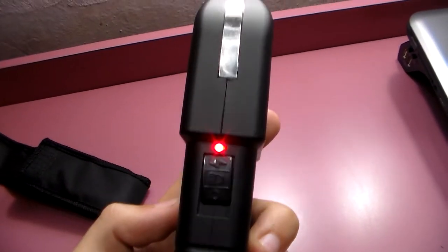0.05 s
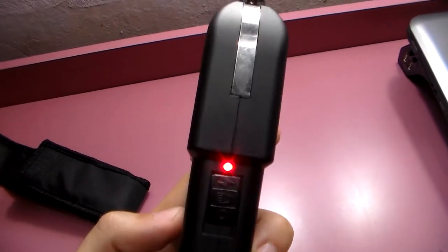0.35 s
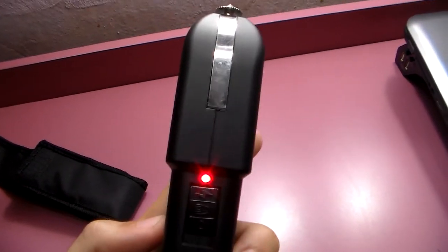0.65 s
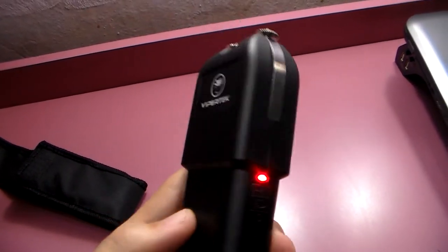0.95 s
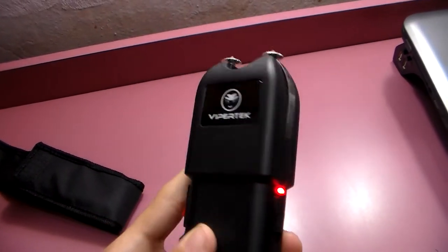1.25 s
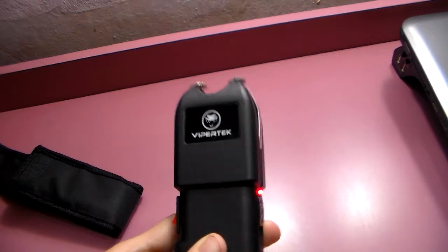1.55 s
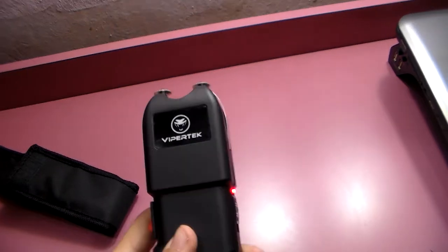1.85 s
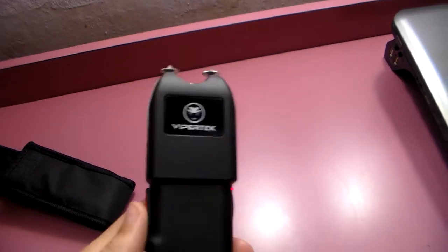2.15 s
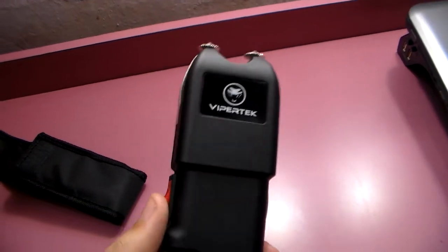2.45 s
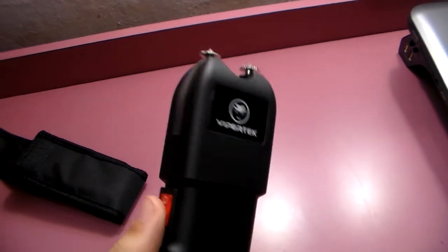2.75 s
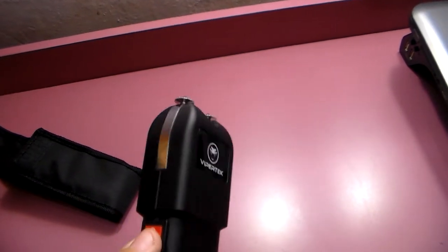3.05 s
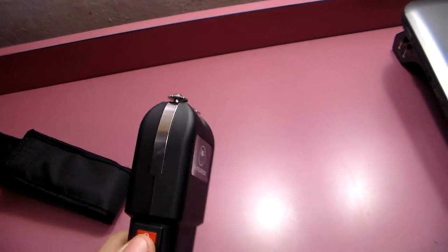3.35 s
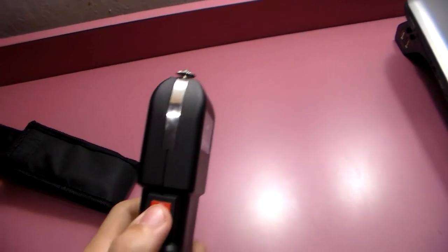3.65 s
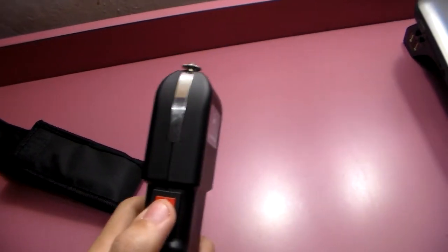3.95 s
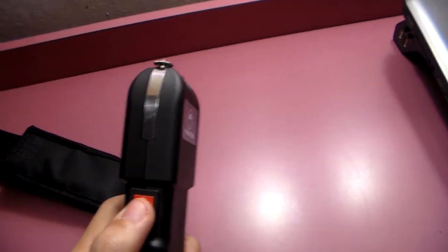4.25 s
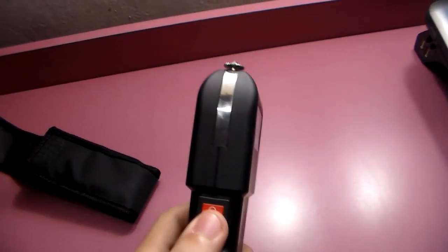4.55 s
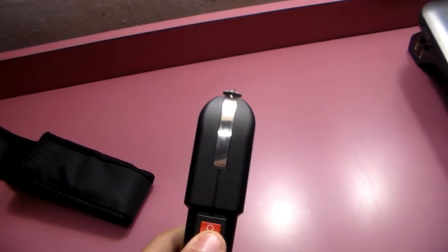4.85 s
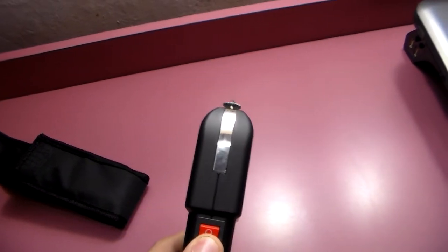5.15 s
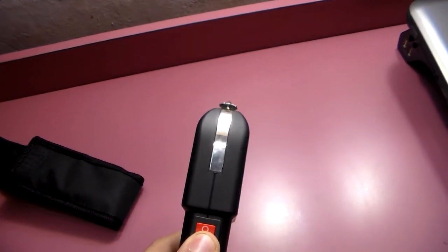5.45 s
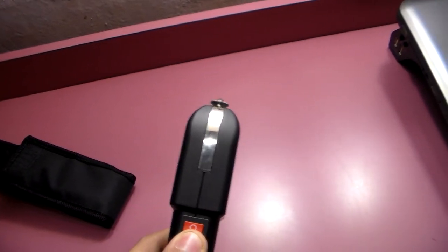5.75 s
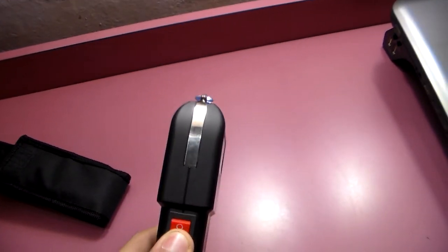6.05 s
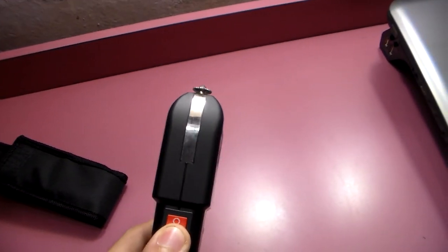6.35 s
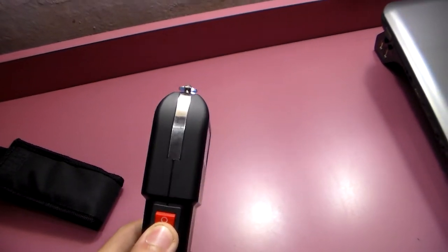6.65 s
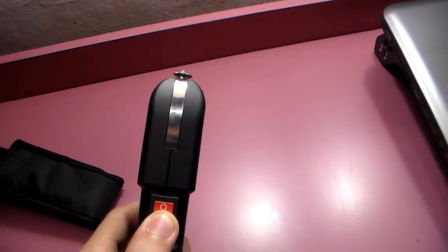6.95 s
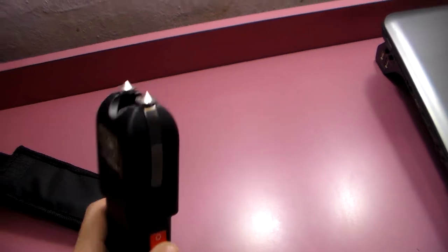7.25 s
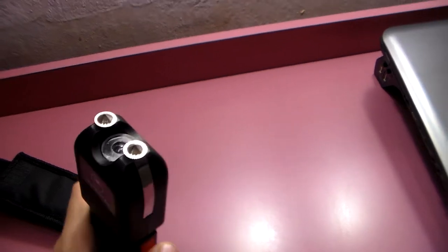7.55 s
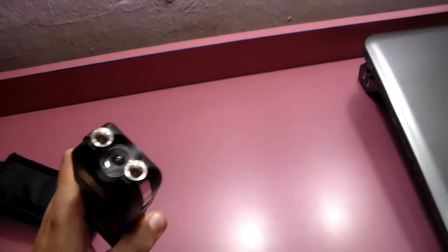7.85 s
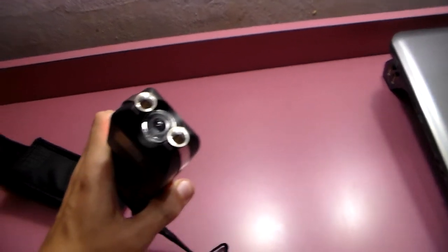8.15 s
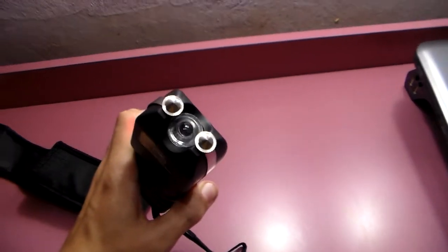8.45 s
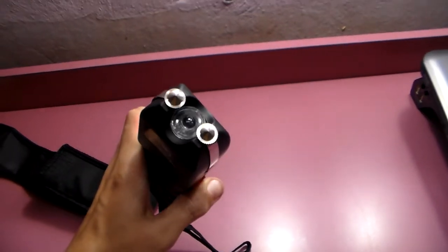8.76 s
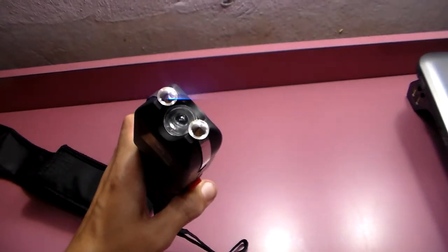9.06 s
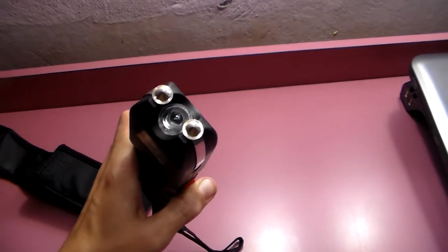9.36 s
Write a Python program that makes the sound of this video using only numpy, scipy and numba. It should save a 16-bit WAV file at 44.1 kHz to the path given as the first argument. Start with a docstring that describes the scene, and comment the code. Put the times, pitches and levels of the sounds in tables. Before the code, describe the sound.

A small room hums quietly with mains, fans and thin high tones. A handheld stun gun is turned over, its plastic case clicking faintly. About halfway through, it fires three short, very loud bursts of rapid cracking sparks that ring in the room and overload the close microphone. A few more clicks of the case and switch follow, then a fourth, slightly longer burst.

```python
"""A small room hums with mains and fans while two thin, high tones swell in the background.
A handheld stun gun is turned over above a desk: its plastic case clicks and skin squeaks faintly on it.
From about 5.5 s it fires three short bursts, 28 sparks a second, each a sharp crack that rings in the room.
The sparks overload the camera's input; its gain control ducks and swells back, twice with soft low ticks.
A few more clicks of case and switch follow, and a fourth, longer burst closes the scene."""
import sys
import numpy as np
from scipy import signal
from scipy.fft import rfft, irfft, next_fast_len
from scipy.io import wavfile
from scipy.ndimage import map_coordinates
from numba import njit

SR = 44100
rng = np.random.default_rng(int(sys.argv[2]) if len(sys.argv) > 2 else 0)


def store_wav(level_fs):
    """Save 16-bit WAV to argv[1]."""
    pcm = np.round(np.clip(np.atleast_2d(level_fs), -1, 1) * 32767)
    wavfile.write(sys.argv[1], SR, pcm.T.astype(np.int16))


N = 419391

# Stereo image of two microphone ports a finger's width apart.
# Each row: frequency in Hz, side minus mid in dB.
MIC_WIDTH = [(200, -11.5), (1000, -25.5), (2500, -18), (5000, -6.5), (8000, -1), (10500, 0), (14000, -3.5)]
# Trigger presses. Each row: first and last spark in seconds, crack trim in dB as the electrodes point at
# the camera, pop trim in dB, push on the input of the first spark and of later ones in full scales.
TRIGGER_BURSTS = [(5.462, 5.603, 0.5, 3, 2.74, 0.75), (6.1746, 6.3202, 2.4, 3, 2.0, 0.93),
                  (6.7677, 6.9137, 3.1, -1, 2.7, 0.45), (9.1596, 9.4160, 2.86, 4, 2.3, 0.81)]
SPARK_DB = 33  # the boost that drives the sparks into overload, and the range of the gain control


def amp(db):
    """Decibels to gain."""
    return 10 ** (np.asarray(db) / 20)


def unit(x):
    """Scale to rms 1."""
    return x / np.sqrt(np.mean(x ** 2) + 1e-20)


def along(points, hz):
    """Read (Hz, value) points on a log frequency axis."""
    f, v = np.transpose(points)
    return np.interp(np.log(hz + 1), np.log(f + 1), v)


def wobble(rate):
    """A smooth random curve, rate knots a second."""
    knots = rng.standard_normal(int(N * rate / SR) + 4)
    grid = np.arange(0, N, 64)
    return np.interp(np.arange(N), grid, map_coordinates(knots, [grid * rate / SR]))


def add(track, s, sound):
    """Mix a sound into a track at s seconds."""
    start = round(s * SR)
    track[..., start:start + sound.shape[-1]] += sound[..., :N - start]


def noise(spectrum, width, size):
    """Stereo noise of rms 1 with a given colour and width."""
    m = next_fast_len(size)
    hz = np.fft.rfftfreq(m, 1 / SR)
    spread = amp(along(width, hz))
    mid, side = rfft(rng.standard_normal((2, m))) * amp(along(spectrum, hz)) / np.hypot(1, spread)
    return unit(irfft([mid + spread * side, mid - spread * side], m)[:, :size])


def tone(hz, jitter_hz):
    """A sine of rms 1 whose pitch trembles."""
    return np.sqrt(2) * np.sin(2 * np.pi * np.cumsum(hz + jitter_hz * wobble(150)) / SR)


def room_tone(air_db=-51, whine_db=-73, whine_hz=10595, swing_hz=65, chirp_db=-82, chirp_hz=2870):
    """The bed: air noise, mains hum, fan tones and a thin electronic whine that warbles."""
    # Colour of the air. Each row: frequency in Hz, relative noise density in dB.
    air_colour = [(12, -29.5), (20, -3.5), (60, -0.5), (90, -14), (122, -15), (148, -12.5), (206, -18),
                  (242, -16), (319, -17), (356, -20), (386, -19), (787, -21), (1010, -23.5), (4550, -30.5),
                  (14000, -37)]
    # Width of the air. Each row: frequency in Hz, side minus mid in dB.
    air_width = [(60, -14.5), (180, -6.5), (550, -9.5), (1640, -6.5), (4950, -2), (14900, 3)]
    # Mains hum and fan tones. Each row: frequency in Hz, rms level in dB.
    hum_tones = [(119.8, -56), (239.7, -55.5), (355, -68), (526, -69.5), (538, -69.5), (600, -73),
                 (778, -68), (817, -74), (2040, -74), (2627, -76.5), (3090, -81.5), (3381, -76),
                 (3618, -75.5), (4608, -73), (5190, -80), (5539, -78), (5599, -76), (6530, -84),
                 (7757, -82)]
    air = amp(air_db + .5 * wobble(5)) * noise(air_colour, air_width, N)
    hum = 0
    for hz, db in hum_tones:
        depth_db = along([(240, .3), (800, 2.1), (4000, 3.1)], hz)  # higher tones flutter more
        flutter_db = depth_db * (.5 * wobble(1.505) + wobble(40))
        hum += amp(db + flutter_db) * tone(hz, jitter_hz=0.0021 * hz)
    warble_hz = 10.3 + 0.76 * wobble(3)
    warble = np.sin(2 * np.pi * np.cumsum(warble_hz) / SR)
    whine = amp(whine_db + 2.0 * wobble(60)) * tone(whine_hz + swing_hz * warble, jitter_hz=55.3)
    chirp = amp(chirp_db) * (1 + warble) * tone(chirp_hz, jitter_hz=20)  # pulses with the warble
    return air + hum + whine + chirp


def high_tones(low_hz=3731, high_hz=4257, low_db=-4):
    """Two thin tones that swell as the camera tips up."""
    # Fader ride. Each row: time in seconds, rms level of the upper tone in dB.
    swell = [(0, -91), (1.3, -72), (2.2, -77), (5, -80.5), (7.8, -73), (8.4, -68), (9.1, -67)]
    pair = amp(low_db) * tone(low_hz, jitter_hz=8) + tone(high_hz, jitter_hz=8)
    swell_db = np.interp(np.arange(N) / SR, *np.transpose(swell))
    return amp(swell_db + wobble(4.2)) * pair


def case_clicks(ring_t60=0.023, snap_t60=0.019, ring_q=7, room_db=-25, room_t60=0.43, attack_s=0.00084):
    """Plastic case and switch: each click is one damped resonance, a bright snap and a trace of room."""
    # Each row: start in seconds, relative level in dB, resonance in Hz, snap against the ring in dB.
    click_cues = [(1.3862, -43, 2340, -14), (1.5786, -41, 2340, -20), (1.7549, -43, 2430, -12),
                  (1.8448, -46, 4200, -18), (1.8947, -45, 2350, -17.5), (2.232, -50, 2600, -18),
                  (3.255, -43, 2450, -22), (3.266, -42, 2630, 5), (3.4665, -48, 2750, -20),
                  (5.1059, -30, 2180, -19), (5.813, -1.5, 600, -14), (6.528, -21, 600, -12),
                  (7.4001, -22.5, 2180, 3), (7.526, -22.5, 11700, -4), (7.949, -44, 2220, -15.5),
                  (9.1205, -37, 3975, 4)]
    contact_colour = [(500, -18), (2000, -6.5), (7000, -1.5), (14000, -13)]
    out, t = np.zeros((2, N)), np.arange(SR // 4) / SR
    attack = 1 - np.exp(-t / attack_s)
    for s, db, hz, snap_db in click_cues:
        contact = noise(contact_colour, MIC_WIDTH, len(t))
        ring = unit(signal.lfilter(*signal.iirpeak(hz, ring_q, fs=SR), contact))
        click = ring * amp(-60 * t / ring_t60) + contact * amp(snap_db - 60 * t / snap_t60)
        echo = (ring + amp(snap_db) * contact) * amp(room_db - 60 * t / room_t60)
        add(out, s, amp(db - 4.0) * (click + echo) * attack)
    return out


def grip_ticks(attack_s=.0007):
    """As the grip shifts, plastic snaps on plastic with a small, clean ring."""
    # Each row: start in seconds, level in dB.
    tick_cues = [(1.932, -39.5), (3.267, -46)]
    # The part's resonances. Each row: frequency in Hz, relative level in dB, seconds to fall 60 dB.
    plastic_modes = [(2700, 0.5, 0.021), (3250, -10, .015), (4657, -4, .012), (6778, -1, .014)]
    out, t = np.zeros(N), np.arange(SR // 10) / SR
    ring = sum(amp(db - 60 * t / t60) * np.sin(2 * np.pi * hz * t) for hz, db, t60 in plastic_modes)
    for s, db in tick_cues:
        add(out, s, amp(db) * ring * (1 - np.exp(-t / attack_s)))
    return out


def skin_squeak(db=-69, hz=4950, peak_s=4.26, fade_s=0.22):
    """One faint squeak of skin on plastic, fading in and out."""
    t = np.arange(N) / SR
    return amp(db) * np.exp(-((t - peak_s) / fade_s) ** 2) * tone(hz, jitter_hz=80.5)


def spark_times(start, stop, per_second=27.6):
    """While the trigger is held the gap charges and fires at a steady rate."""
    return np.linspace(start, stop, round((stop - start) * per_second) + 1)


def sparks(shock_db=4, crack_db=-4, crack_s=0.0093, pop_db=-15, pop_s=0.0054,
           first_pop_db=4.5, pop_scatter_db=3.5, echo_db=-13, build_s=0.0034, alike=0.59):
    """Each discharge: a shock front, a cluster of close reflections, a low pop and the room's tail."""
    # The crack with its reflections off the desk. Each row: frequency in Hz, relative density in dB.
    crack_colour = [(200, -38), (1000, -15.5), (2000, -10.5), (3200, -5.5), (4200, 2.5), (5600, 3.5),
                    (7500, 3.5), (10500, -4), (12500, 1.5), (14000, 0)]
    # The short, low pop of each spark overloading the input.
    # Each row: frequency in Hz, relative density in dB.
    pop_colour = [(60, -6.5), (250, -2.5), (450, 3.5), (750, -3), (1000, -5.5), (1500, -5), (3000, -13),
                  (8000, -30)]
    pop_width = [(150, 3.5), (600, -2.5), (2000, -3.5)]
    out, t = np.zeros((2, N)), np.arange(SR) / SR
    early = t[:SR // 25]
    shock_age = early / .00006
    shock = amp(shock_db) * (shock_age - 1) * np.exp(-shock_age)
    crack_fade, pop_fade = np.exp(-(early / crack_s) ** 2), np.exp(-early / pop_s)
    echo_build = amp(echo_db) * (1 - np.exp(-t / build_s))
    # the echo paths stay much the same, but the arc takes a new path each time
    kept, fresh = np.sqrt([alike, 1 - alike])
    same_tail, same_crack = room_tail(SR), noise(crack_colour, MIC_WIDTH, len(early))
    for start, stop, aim_db, burst_pop_db, _, _ in TRIGGER_BURSTS:
        for k, s in enumerate(spark_times(start, stop)):
            # the first spark of each burst pops harder
            accent_db = pop_scatter_db * rng.standard_normal() if k else first_pop_db
            new_crack = noise(crack_colour, MIC_WIDTH, len(early))
            crack = amp(crack_db + aim_db) * (kept * same_crack + fresh * new_crack)
            pop = amp(pop_db + burst_pop_db + accent_db) * noise(pop_colour, pop_width, len(early))
            add(out, s, shock + crack * crack_fade + pop * pop_fade)
            add(out, s, echo_build * (kept * same_tail + fresh * room_tail(SR)))
    return out


def room_tail(size):
    """Diffuse echo off the walls, in which the treble dies first."""
    # Colour of the echo. Each row: frequency in Hz, relative density in dB.
    echo_colour = [(150, -49), (300, -36), (500, -26), (950, -22), (1250, -10), (1600, -10.5), (2100, -8.5),
                   (2600, -6), (3300, -2), (4800, 0.5), (6000, 3.5), (7500, 3), (10500, 1), (12500, 1),
                   (14000, -4.5)]
    # Reverb time. Each row: frequency in Hz, seconds to fall 60 dB.
    reverb_times = [(300, 0.93), (1500, 0.5), (4000, 0.52), (7000, 0.47), (10000, 0.39), (14000, 0.38)]
    hz, t, bands = signal.stft(noise(echo_colour, MIC_WIDTH, size), SR, nperseg=256)
    decay = amp(-60 * t / along(reverb_times, hz)[:, None])
    return signal.istft(bands * decay, SR, nperseg=256)[1][:, :size]


@njit
def gain_cut(need, hold, recovery):
    """Ducking in dB: it jumps up at once, holds, then relaxes (times in samples)."""
    out, cut, last = np.zeros(len(need)), 0.0, 0
    for i in range(len(need)):
        if need[i] >= cut:
            cut, last = need[i], i
        elif i - last > hold[last]:
            cut -= cut / recovery[last]
        out[i] = cut
    return out


def gain_control(x, target_db=-2):
    """Overload turns the gain down; it swells back after a hold."""
    # Release after the bursts. Each row: time, hold and recovery time constant, all in seconds.
    release_times = [(5.602, 0.27, 1.3), (6.325, 0.27, 0.15), (6.92, 0.23, 0.21)]
    peak_db = 20 * np.log10(np.abs(x).max(axis=0) + 1e-9)
    need_db = np.clip(peak_db - target_db, 0, SPARK_DB)
    s, *columns = np.transpose(release_times)
    hold, recovery = [SR * np.interp(np.arange(N) / SR, s, column) for column in columns]
    return x * amp(-gain_cut(need_db, hold, recovery))


def input_sag(rise_s=0.00095, length_s=0.03, pan_db=1.5, scatter=.45, coupling_hz=1.36, rail=1.0):
    """Each spark shoves the input off its rest point; two coupling capacitors let it swing back."""
    out, t = np.zeros((2, N)), np.arange(SR // 4) / SR
    shove = (1 - np.exp(-t / rise_s)) * np.exp(-(t / length_s) ** 1.09)
    pan = amp([pan_db / 2, -pan_db / 2])  # the left input is pushed harder
    for start, stop, _, _, first_push, later_push in TRIGGER_BURSTS:
        for k, s in enumerate(spark_times(start, stop)):
            push = (later_push if k else first_push) * pan + scatter * rng.standard_normal(2)
            add(out, s, -np.outer(push, shove))
    coupling = signal.butter(1, coupling_hz, "high", fs=SR)
    swing = signal.lfilter(*coupling, signal.lfilter(*coupling, out))
    return np.maximum(swing, -rail)


def low_ticks(gap_s=.0213, settle_s=0.016, edge_hz=3500, buzz_db=-2, buzz_ticks=9, fade_db_per_s=149.5):
    """Small steps of the input's rest point settle: even ticks, then a fading buzz at twice the rate."""
    # Runs while the level climbs back. Each row: start and quickening in seconds, step size in dB.
    tick_runs = [(6.5906, 6.6546, -26.5), (7.1239, 7.232, -29)]
    out, t = np.zeros(N), np.arange(SR // 4) / SR
    step = np.exp(-t / settle_s)
    for start, quickens, db in tick_runs:
        for s in np.arange(start, quickens - gap_s / 2, gap_s):
            add(out, s, amp(db) * step)
        for later in np.arange(buzz_ticks) * gap_s / 2:
            add(out, quickens + later, amp(db + buzz_db - fade_db_per_s * later) * step)
    return signal.lfilter(*signal.butter(1, edge_hz, fs=SR), out)


def scene():
    """Very loud sparks over handling noise in a quiet room."""
    return amp(SPARK_DB) * sparks() + case_clicks() + grip_ticks() + room_tone() + high_tones() + skin_squeak()


def record(dry):
    """Gain control, a sagging input that clips just under full scale, and a steep treble cut."""
    clipped = np.clip(gain_control(dry) + input_sag() + low_ticks(), -.95, .95)
    lowpass = signal.firwin(401, cutoff=14280, window=("kaiser", 9), fs=SR)
    return signal.fftconvolve(clipped, lowpass[None], mode="same", axes=1)


dry = scene()
out = record(dry)
store_wav(out)
```